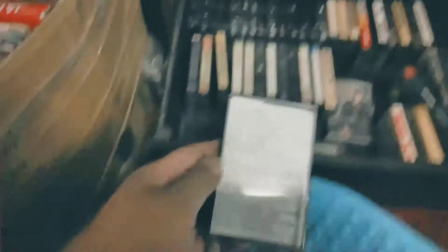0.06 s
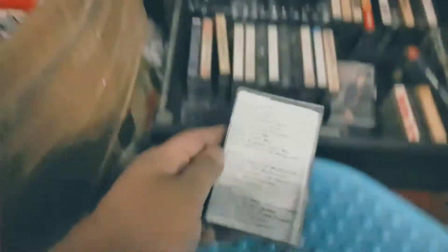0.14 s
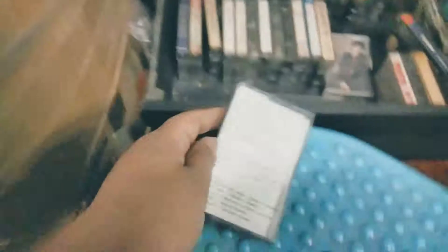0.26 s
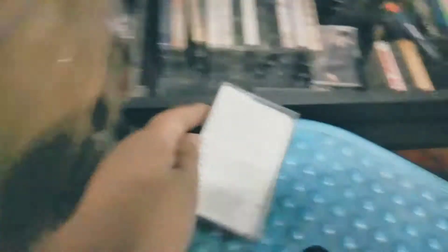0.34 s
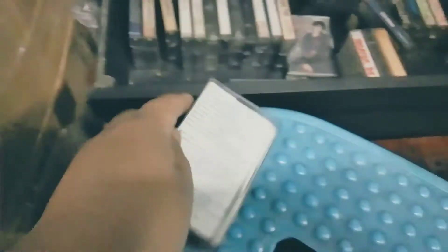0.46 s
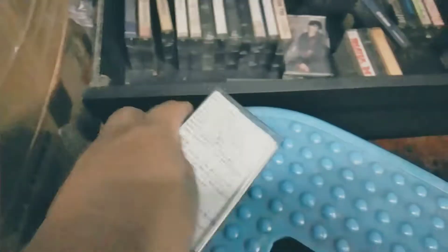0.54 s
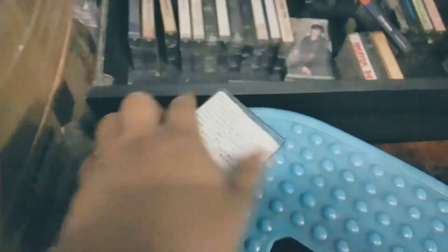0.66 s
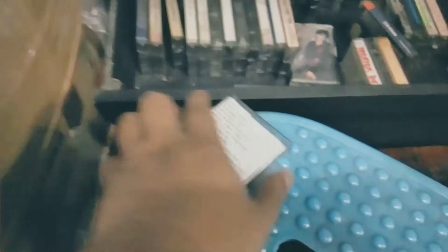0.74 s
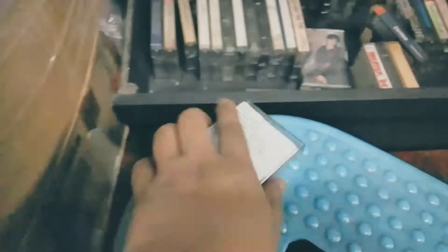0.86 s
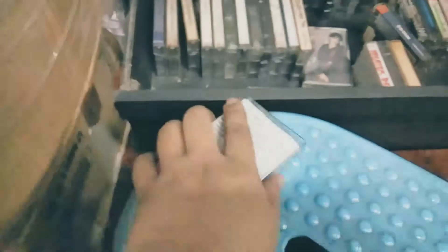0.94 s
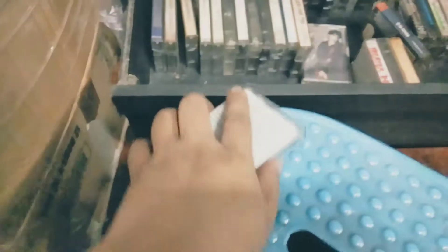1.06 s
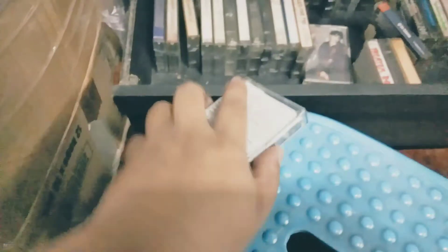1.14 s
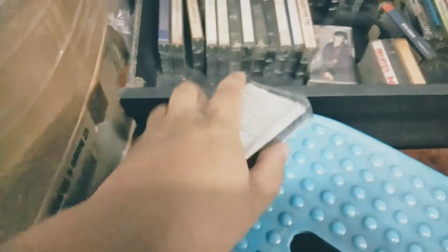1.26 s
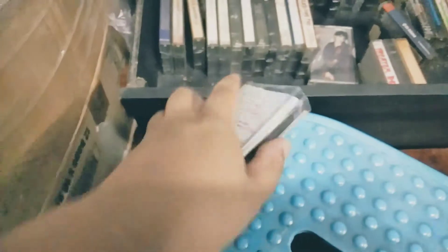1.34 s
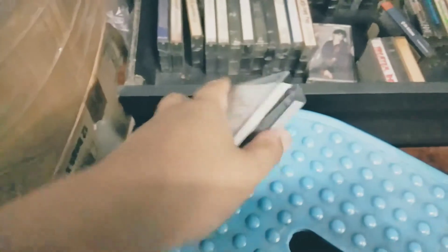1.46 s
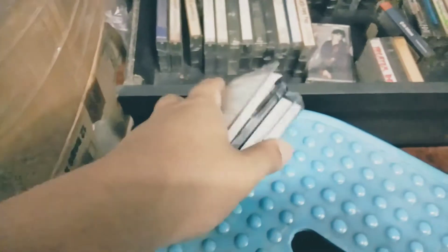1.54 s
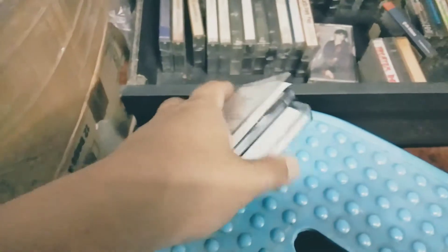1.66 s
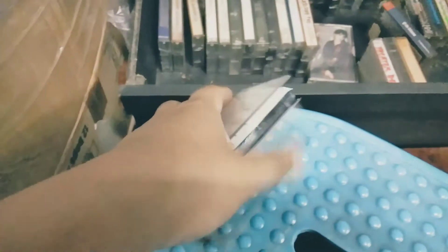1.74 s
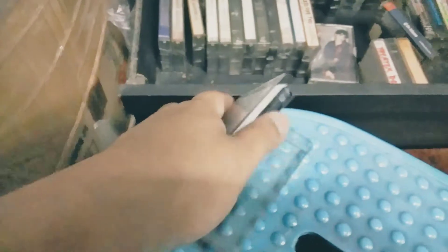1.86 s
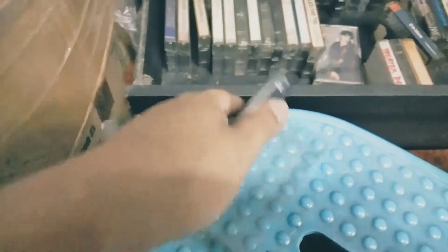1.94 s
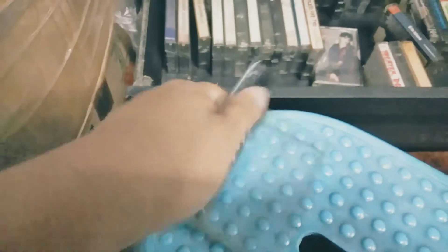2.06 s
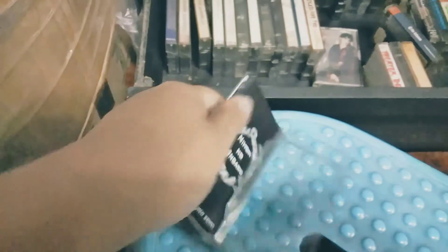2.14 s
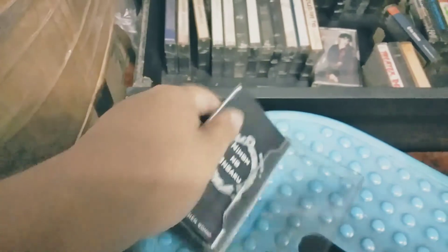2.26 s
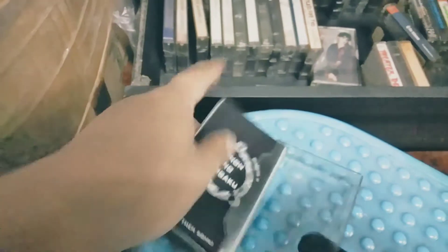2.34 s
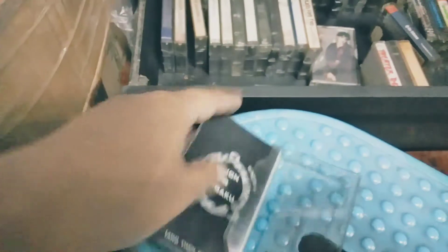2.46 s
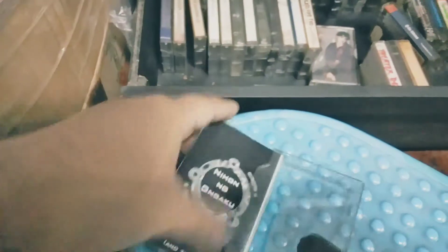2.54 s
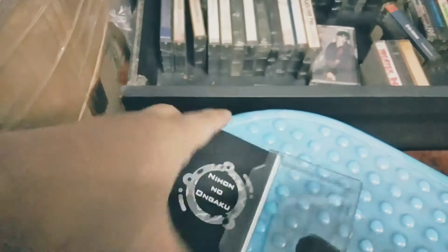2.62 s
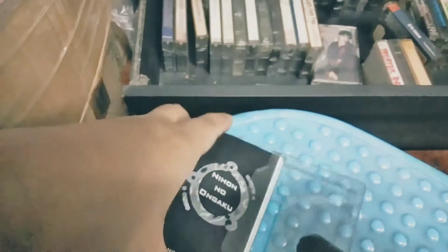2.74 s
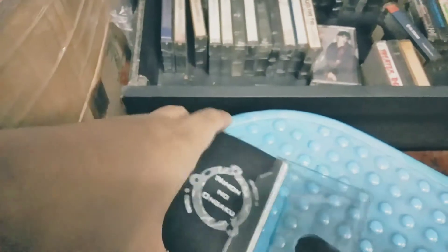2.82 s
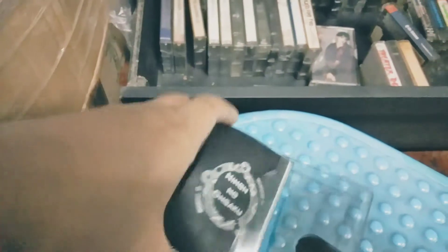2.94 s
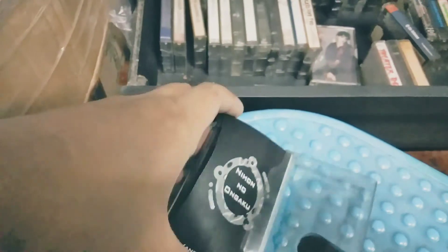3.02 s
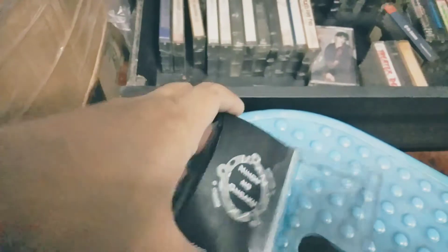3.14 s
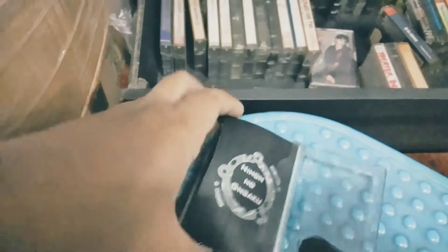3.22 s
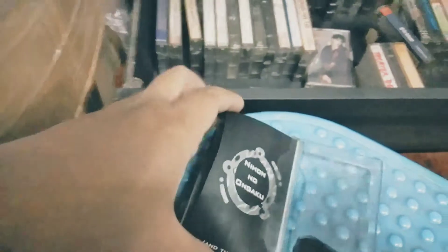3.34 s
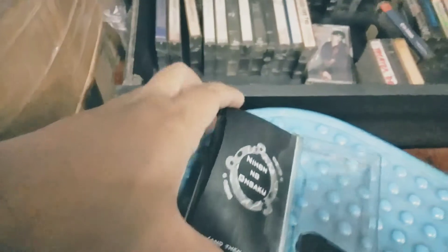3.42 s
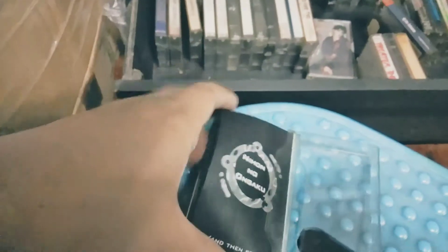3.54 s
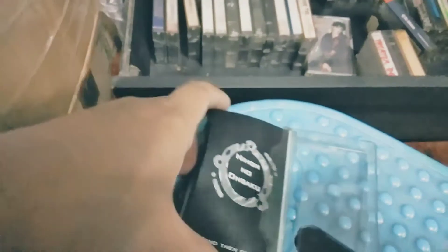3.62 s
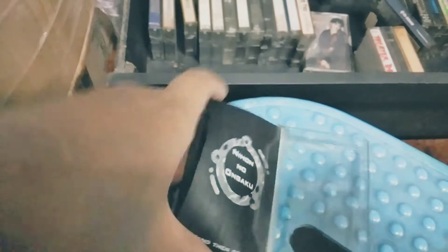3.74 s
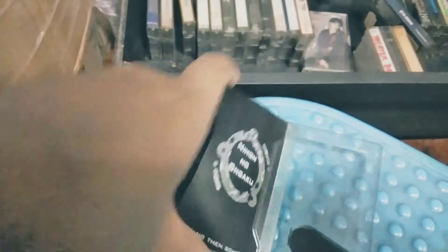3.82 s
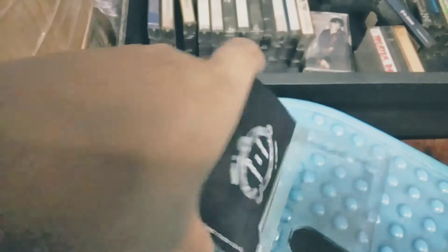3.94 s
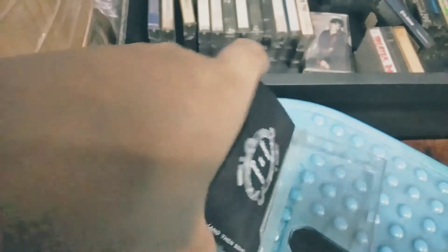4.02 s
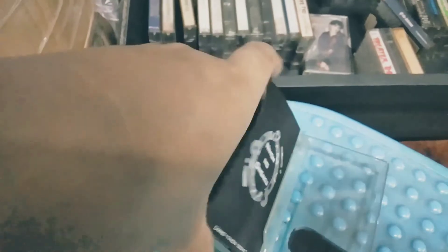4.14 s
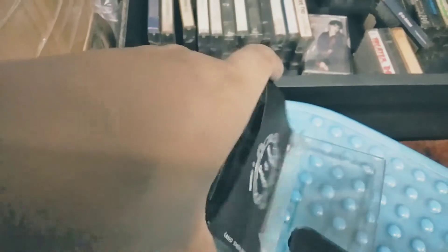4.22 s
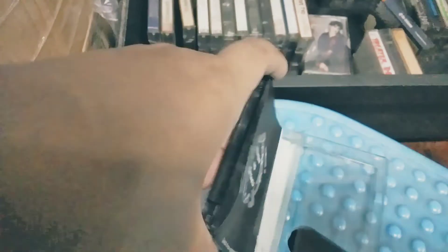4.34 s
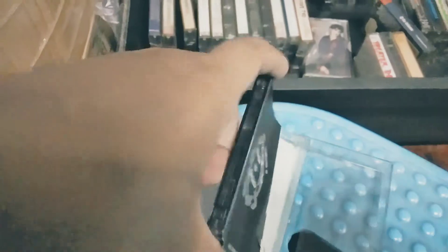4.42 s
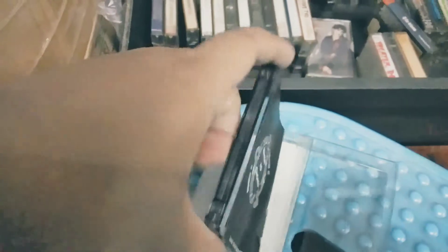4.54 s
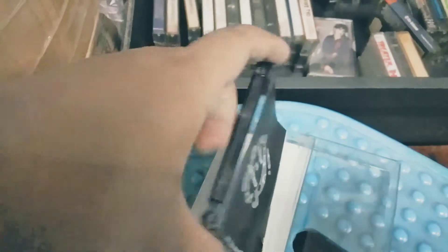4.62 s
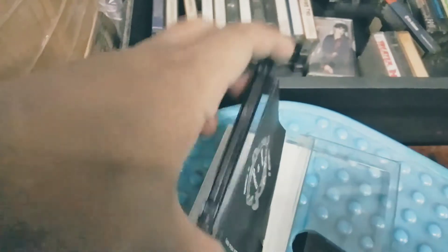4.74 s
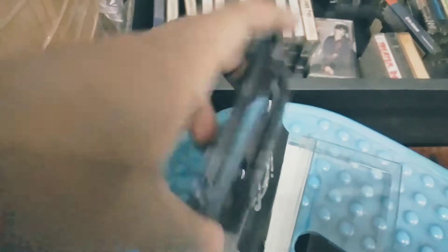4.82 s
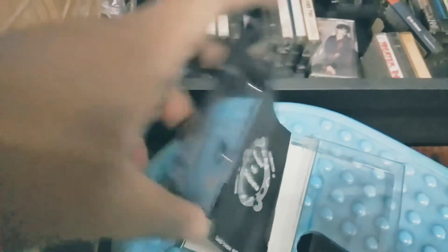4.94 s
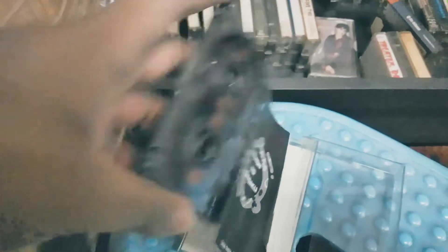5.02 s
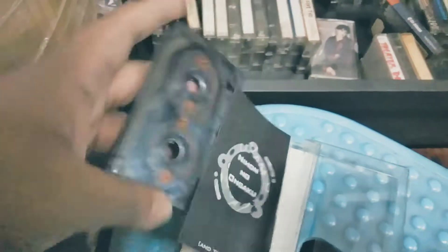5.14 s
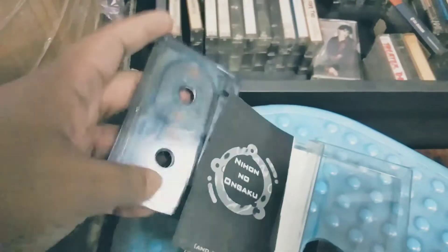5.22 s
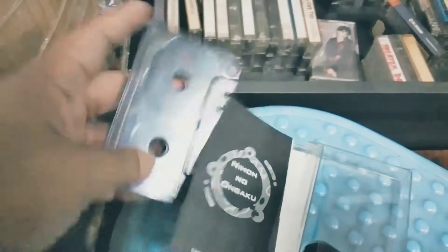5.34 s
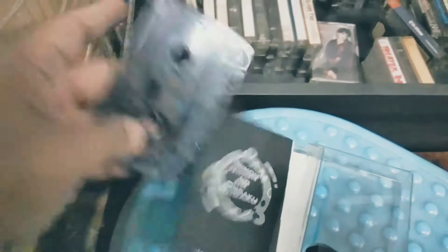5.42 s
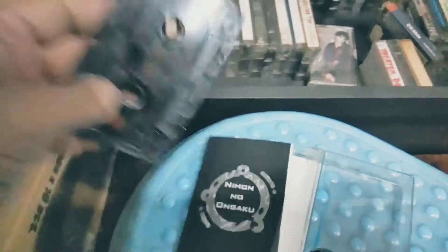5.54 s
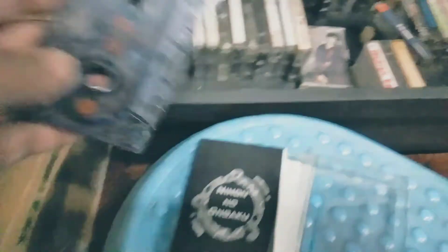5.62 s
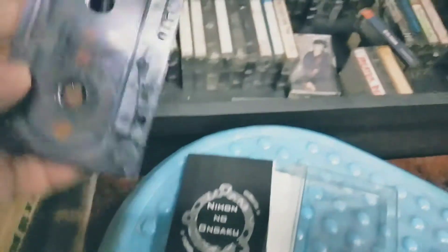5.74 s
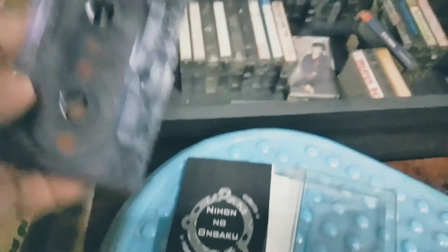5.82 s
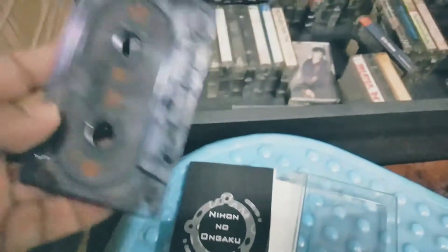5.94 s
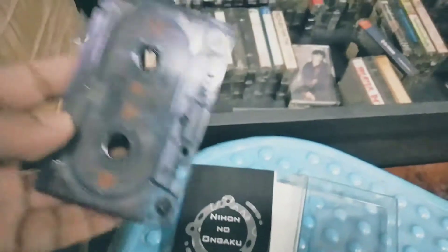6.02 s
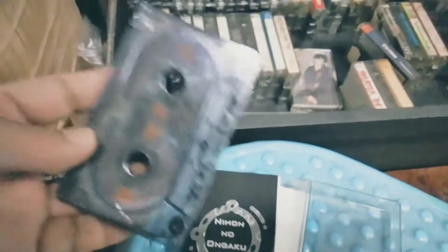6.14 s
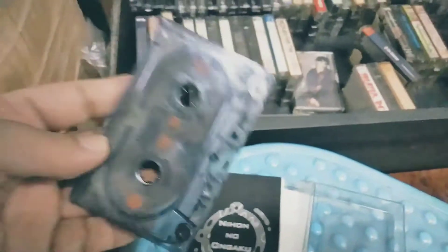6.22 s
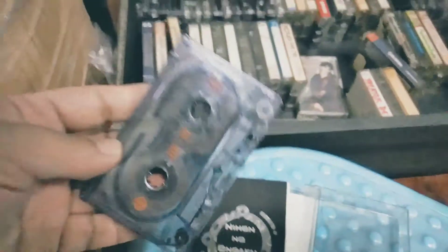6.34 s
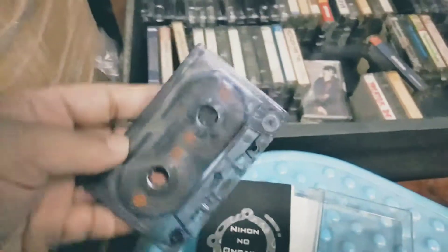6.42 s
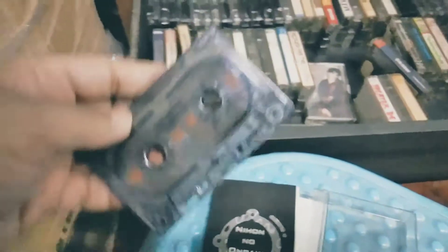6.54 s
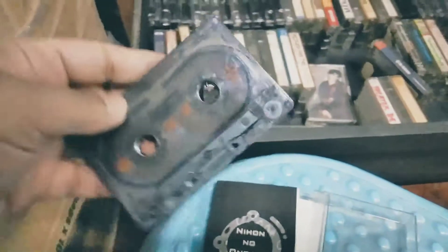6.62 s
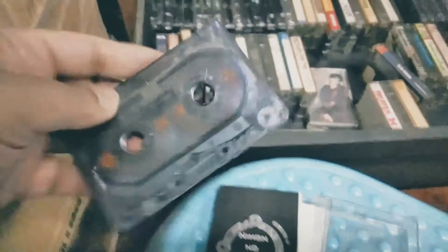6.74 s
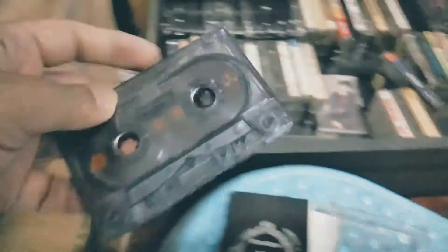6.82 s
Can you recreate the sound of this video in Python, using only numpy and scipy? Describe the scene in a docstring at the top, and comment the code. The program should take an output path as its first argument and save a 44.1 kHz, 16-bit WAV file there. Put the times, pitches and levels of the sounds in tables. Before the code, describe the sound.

A plastic cassette case knocks onto a hollow plastic stool, snaps open, clatters loosely, then the cassette ticks and slides from its card sleeve.

```python
"""Snapping open a cassette case

A cassette case is put down on a hollow plastic stool in a small room and snapped open with one hand.
The open case clatters, soft bumps ring the stool, and the cassette ticks and slides out of its card sleeve.
Hits are short bursts of noise that ring each body's resonances; rubbing is grainy noise in smooth strokes.
Room reflections follow the hits, and a slowly swelling rumble and hiss of room air lies under it all."""
import sys
import numpy as np
from scipy import signal
from scipy.fft import rfft, irfft, next_fast_len
from scipy.io import wavfile

SR = 44100
rng = np.random.default_rng(int(sys.argv[2]) if len(sys.argv) > 2 else 0)


def dump_mix(stems):
    """Bounce the given channels to the path in sys.argv[1] as a 16-bit WAV at rate SR."""
    frames = np.atleast_2d(stems).T  # one column per channel
    limited = np.clip(frames, -1, 1)  # hard clip at full scale
    pcm = np.round(limited * 32767).astype(np.int16)
    wavfile.write(sys.argv[1], SR, pcm)


N = 302967

# All dB values in the tables are relative: each source also has its own overall gain.
# Room air: spectra of its rumble and its hiss (frequency [Hz], density [dB per Hz])
AIR_RUMBLE_SPECTRUM = [(12, -25), (20, -6), (60, -3.5), (87, -2), (164, -3), (209, -8.5), (252, -15),
                       (381, -10), (415, -4), (510, -11.5), (594, -7.5), (718, -10.5), (912, -5),
                       (1030, -7), (1200, -11.5), (1560, -17), (2640, -120)]
AIR_HISS_SPECTRUM = [(710, -40), (1200, -4.5), (1500, -2), (2100, -2), (2700, -8), (3500, -8), (4200, -9.5),
                     (5000, -14), (6400, -8.5), (7200, -15), (8500, -20.5), (11500, -22), (15500, -21.5),
                     (16000, -33)]
# Slow swell of the room air (time [s], level [dB])
AIR_SWELL = [(0, 2), (.35, 3), (1, 3), (3.6, 5.5), (6.4, 4), (6.87, 5.5)]
RUMBLE_DB, HISS_DB = -64, -66.5  # rms before the swell

# How long the room rings (frequency [Hz], time to fall by 60 dB [s])
ROOM_DECAY = [(200, 0.58), (1000, 0.23), (3000, 0.68), (6000, 0.46), (14000, 0.14)]
# Edges of the five registers that hits and reflections are split into (frequency [Hz])
REGISTER_EDGES_HZ = [180, 600, 1600, 3300, 7400, 16000]

# Rubbing strokes (start [s], length [s], level at the top of the stroke [dB])
# the case shifts on the seat
SEAT_RUBS = [(0.49, 0.14, -46), (0.64, 0.19, -53.5), (0.86, 0.22, -66), (1.13, 0.086, -56),
             (1.26, .28, -56.5)]
# the card brushes the open lid (same columns)
LID_RUBS = [(2.11, 0.26, -48.5), (2.29, 0.53, -57.5), (3.02, 0.26, -57)]
# the lid's edge slides on the case (same columns)
LID_EDGE_SLIDES = [(1.73, 0.1, -57), (2.62, 0.11, -58)]
# the cassette is worked along its sleeve (same columns)
SLEEVE_RUBS = [(3.79, 0.36, -49.5), (4.19, 0.12, -53.5), (4.33, 0.2, -49.5), (4.59, 0.13, -53)]
# the cassette slides free and grazes the card (same columns)
SLEEVE_SLIDES = [(4.75, 0.17, -60.5), (4.82, 0.23, -49), (4.98, 0.29, -62), (5.33, 0.093, -62.5),
                 (5.42, 0.13, -60)]
# Spectra of the rubbing on the seat, of the card, and of the sliding (frequency [Hz], density [dB per Hz])
SEAT_SPECTRUM = [(240, -44), (400, -13), (526, -14.5), (1070, -7), (1430, -19), (2250, -12), (3450, -32),
                 (3950, -18.5), (8960, -35), (15000, -40)]
CARD_SPECTRUM = [(150, -29), (280, 7.5), (480, -7.5), (800, -5.5), (1150, -2), (1550, -0.5), (2100, -5),
                 (2700, -1), (4050, -6), (5200, -6.5), (6600, -2.5), (8500, -15.5), (12000, -16),
                 (15800, -17)]
SLIDE_SPECTRUM = [(350, -53), (600, -22), (737, -10), (1160, -16), (1310, -21), (1530, -0.5), (1700, -13.5),
                  (3120, -14), (4160, -9), (5260, -13), (6550, -9.5), (8050, -18), (14900, -18.5),
                  (16000, -30)]

# Soft bumps of hand and case on the stool (time [s], peak level [dB], push time [s])
THUMPS = [(0.4434, -25.5, 0.00086), (0.976, -40.5, 0.0013), (1.1766, -29.5, 0.00043), (1.51, -51, 0.0015),
          (1.936, -50, 0.0026), (2.732, -33.5, 0.0012), (2.831, -42.5, 0.00079), (3.315, -38.5, 0.0012),
          (5.085, -44, 0.00012)]

# Contacts (time [s], chatter time [s], level [dB], brightness [dB per octave], time to first rebound [s])
# Only rebound times above 5 ms give a rebound.
# the closed case on the seat
KNOCKS = [(0.3583, 0.0041, -25.5, 0.8, 0), (0.4937, 0.0035, -27, -1, 0), (0.5048, .0054, -43, -2, 0.0085),
          (0.572, 0.0028, -49.5, -2.5, 0.014), (0.596, .008, -45, -2.5, 0),
          (0.6045, 0.0044, -45, -2.5, 0.013), (0.635, 0.0067, -44, 7, 0), (0.6415, .0035, -29, -.8, 0.001),
          (0.826, 0.0059, -20, 2.3, .024), (1.058, 0.0051, -57, 2.5, 0.012), (1.073, .0039, -54, 2.5, 0),
          (1.263, 0.012, -56, 2.5, 0.0094), (1.3424, 0.016, -56, -2, 0.011), (1.53, .015, -46, -1.5, 0.001),
          (1.6075, 0.0036, -45.5, 0.5, 0)]
# the lid slips past its catches (same columns)
SNAPS = [(1.5521, 0.0033, -24, 1, 0.018)]
# the lid flies open against its stop and rattles (same columns)
LID_STOPS = [(1.8345, 0.0072, -25.5, 0, 0.028)]
# the open case and its loose lid (same columns)
CLATTER = [(1.787, .011, -47.5, 2.5, 0), (2.0303, 0.0087, -38.5, -1, 0.0032),
           (2.055, 0.014, -41.5, 0, 0.0013), (2.1446, 0.0072, -40.5, -2, 0.015),
           (2.183, 0.0085, -39.5, -4, 0.0087), (2.195, 0.008, -28.5, 2, 0.00097),
           (2.2235, 0.0098, -35.5, -1.5, 0), (2.2735, 0.003, -51.5, -8, 0.00072),
           (2.2913, 0.0091, -34.5, 0, 0.0049), (2.358, 0.0094, -35.5, 2.3, 0),
           (2.365, 0.0069, -35.5, 1.3, 0), (2.389, 0.0078, -46, -2, 0.015), (2.4196, 0.0069, -36.5, 0.5, 0),
           (2.485, .015, -47, -4, 0.0012), (2.498, .0099, -34.5, 3, 0), (2.5968, 0.013, -36, 2, 0.0026),
           (2.6125, 0.017, -40, 1, 0.00059), (2.7223, 0.0054, -50.5, 1.5, 0),
           (2.745, .0067, -55, -1.5, 0.0041), (2.8301, 0.017, -48, 0.5, 0),
           (2.909, 0.01, -54, -4.5, 0.0058), (3.0388, .0096, -43.5, -1.3, 0.0012),
           (3.095, 0.012, -51.5, -1.5, 0), (3.3135, 0.0077, -31, -0.5, 0.017)]
# Cassette contacts (time [s], chatter time [s], level [dB], brightness [dB per octave])
# its edges tick as it shifts in its sleeve
EDGE_TICKS = [(3.231, 0.0078, -50.5, -1), (3.535, 0.0076, -54.5, -3.5), (3.5988, 0.0061, -41, -2),
              (3.838, 0.01, -43, 1), (3.8602, 0.0042, -47, -3), (3.876, 0.011, -46, 0),
              (3.939, 0.0054, -56, -4), (3.9564, 0.008, -43, -0.7), (4.047, 0.011, -48.5, 0),
              (4.095, 0.028, -54, -3.5), (4.1275, .011, -52.5, 0.5), (4.1843, 0.0078, -50, 0),
              (4.279, 0.0033, -49.5, -0.5), (4.2973, 0.0058, -43.5, 2.2), (4.3287, 0.0057, -51.5, 3.5),
              (4.385, 0.026, -47.5, -1.5), (4.437, 0.01, -46.5, 0), (4.513, 0.011, -50, -.5),
              (4.5912, .0068, -49, 1), (4.6765, 0.0081, -41, 0.8), (5.0215, 0.01, -67.5, 14.5),
              (5.161, 0.011, -62.5, 5), (5.217, 0.0022, -54, 4), (5.499, 0.0053, -53, 1.5)]
# its flat side knocks and brings out its hollow tone (same columns)
FLAT_KNOCKS = [(3.1842, .006, -42, 0.5), (3.2181, 0.0032, -39, 1), (4.492, .0069, -53, -4),
               (4.6575, 0.0077, -42, 1), (4.685, 0.006, -38.5, 1), (4.724, 0.0055, -47.5, 1.5),
               (4.8, 0.009, -53.5, -3), (4.919, .009, -47, -1)]

# Resonances of each body (frequency [Hz], width [Hz], strength [dB])
STOOL_MODES = [(180.5, 34, 1), (247, 34, 6), (402, 66, 4), (530, 86, -5), (673, 260, -1.5), (990, 51, -4),
               (1830, 580, -13)]
CLOSED_CASE_MODES = [(338, 53, 14), (888, 210, 9.5), (1045, 100, 13.5), (1470, 78, -5), (3140, 170, 3.5),
                     (3710, 390, 0), (6260, 93, 9), (11100, 840, 0)]
CATCH_MODES = [(1070, 140, 8.7), (1430, 210, 9.9), (4400, 310, 7.3), (5120, 840, 19), (6170, 300, 4.4),
               (10900, 1500, 16)]
LID_MODES = [(1100, 97, 4.3), (1510, 270, 4.6), (2940, 280, 8.6), (3500, 140, 4), (4230, 260, 5),
             (5360, 870, 9.5), (6300, 210, 8.8), (10640, 1400, 6.1)]
OPEN_CASE_MODES = [(316, 57, 22.5), (1035, 240, 5.7), (1431, 31, 10.4), (2900, 39, 8.3), (3670, 85, 12.6),
                   (4200, 420, 2.7), (6370, 240, 8.4), (6760, 53, 2.4), (10900, 1800, 3.4)]
CASSETTE_MODES = [(308, 40, 15.7), (699, 16, 5.3), (966, 94, 3), (1476, 65, 13.5), (1980, 21, 3.4),
                  (3360, 88, 4.4), (4025, 200, 13.4), (6330, 100, 6.1), (11300, 970, 5.8)]
# Colour shared by all contacts of one kind: one level per register, low to high (level [dB])
CLOSED_CASE_COLOUR = [-12.5, 1, -9, -7, -21.5]
CATCH_COLOUR = [-49, -14, -17, 1, -12]
LID_COLOUR = [-19, -8.5, -3, 0.5, -9]
OPEN_CASE_COLOUR = [-13.5, -3.5, -5.5, 0.5, -13.5]
EDGE_TICK_COLOUR = [-7, -3.5, -2.5, 0.5, -18.5]
FLAT_KNOCK_COLOUR = [-16.5, 0, -6.5, -12.5, -30]

HIT_SIZE, ATTACK_SIZE = int(.09 * SR), int(.012 * SR)  # samples in a hit, and in the start that sets its level
TILT_PIVOT_HZ = 2300  # brightness leaves the level here unchanged
# the second rebound comes sooner and weaker than the first
REBOUND_GAP_SHARE, REBOUND_FADE_DB = .8, -2.5
REBOUND_SMEAR_S = 0.0046  # extra chatter time of the first rebound
MIC_DIP_HZ, MIC_DIP_WIDTH_HZ, MIC_DIP_DEPTH = 7880, 3060, 0.4  # depth: 0 is none, 1 is full
CUTOFF_HZ = 15900


def from_db(db):
    """Turn decibels into gain."""
    return 10 ** (np.asarray(db) / 20)


def rms(x):
    """Root mean square, a sound's average strength."""
    return np.sqrt(np.mean(x ** 2) + 1e-20)


def at_hz(points, hz):
    """Read a table between its points, with frequency spaced as in pitch."""
    table_hz, value = np.transpose(points)
    return np.interp(np.log(np.maximum(hz, 1)), np.log(table_hz), value)


def gain_curve(rows):
    """A level curve as gain, fading to silence just outside its span."""
    s, db = np.transpose(rows)
    times = np.r_[s[0] - .04, s, s[-1] + .04]
    levels = np.r_[-120, db, -120]
    return from_db(np.interp(np.arange(N) / SR, times, levels))


def band(x, low, high):
    """Keep only the sound between two frequencies."""
    return signal.sosfilt(signal.butter(3, [low, high], "band", fs=SR, output="sos"), x)


def resonate(x, hz, width_hz):
    """One resonance with gain 1 at its top; a narrower one rings longer."""
    r = np.exp(-np.pi * width_hz / SR)
    feed = np.array([1, 0, -1]) * (1 - r * r) / 2
    feedback = [1, -2 * r * np.cos(2 * np.pi * hz / SR), r * r]
    return signal.lfilter(feed, feedback, x)


def colour(x, spectrum):
    """Shape a steady sound by a spectrum and bring its rms to 1."""
    size = next_fast_len(N)
    gain = from_db(at_hz(spectrum, np.fft.rfftfreq(size, 1 / SR)))
    shaped = irfft(rfft(x, size) * gain, size)[:N]
    return shaped / rms(shaped)


def room_air():
    """Room air is random noise: a low rumble and a brighter hiss that swell slowly together."""
    rumble = from_db(RUMBLE_DB) * colour(rng.standard_normal(N), AIR_RUMBLE_SPECTRUM)
    hiss = from_db(HISS_DB) * colour(rng.standard_normal(N), AIR_HISS_SPECTRUM)
    return (rumble + hiss) * gain_curve(AIR_SWELL)


def room(x, modes, wet_db, build_s):
    """Add diffuse reflections, which return in the body's mean colour and die away band by band."""
    white = rng.standard_normal(N)
    field = white + sum(from_db(db) * resonate(white, hz, width) for hz, width, db in modes)
    out, build = x, np.exp(-1 / (build_s * SR))
    for low, high in zip(REGISTER_EDGES_HZ, REGISTER_EDGES_HZ[1:]):
        t60 = at_hz(ROOM_DECAY, np.sqrt(low * high))
        keep = from_db(-60 / (SR * t60)) ** 2  # share of energy left after one sample
        power = band(x + 1e-12 * white, low, high) ** 2
        energy = signal.lfilter([(1 - keep) * (1 - build)], [1, -keep - build, keep * build], power)
        diffuse = band(field, low, high)
        out = out + from_db(wet_db) * np.sqrt(np.abs(energy)) * diffuse / rms(diffuse)
    return out


def near_echoes(x, wet_db, t60, dull_hz):
    """Shelves and walls nearby return the hits as a dense, dulled, dying spray of echoes."""
    t = np.arange(SR // 3) / SR
    build = np.minimum(t / 0.0039, 1)
    echoes = rng.standard_normal(len(t)) * from_db(-60 * t / t60) * build
    echoes = signal.sosfilt(signal.butter(1, dull_hz, fs=SR, output="sos"), echoes)
    echoes = echoes / np.sqrt(np.sum(echoes ** 2))
    return from_db(wet_db) * signal.fftconvolve(x, echoes)[:N]


def strokes(table, swell):
    """A stroke speeds up and slows down again, so its level is one arch; a higher swell narrows it."""
    t = np.arange(N) / SR
    level = np.zeros(N)
    for s, length_s, db in table:
        progress = np.clip((t - s) / length_s, 0, 1)
        level += from_db(db) * np.abs(np.sin(np.pi * progress)) ** swell
    return level


def rubbing(table, spectrum, swell, catches_per_s, rough_db):
    """Surfaces catch and slip at uneven moments, so their hiss comes in small grains of uneven size."""
    grain = np.cumsum(rng.random(N) < catches_per_s / SR)  # each catch starts a new grain
    size = from_db(rough_db * np.clip(rng.standard_normal(N), -2, 2))[grain]
    return colour(size * rng.standard_normal(N), spectrum) * strokes(table, swell)


def case_rubbing():
    """The case rubs the seat, the card brushes the lid, and the lid's edge slides on the case."""
    seat = from_db(-3.0) * rubbing(SEAT_RUBS, SEAT_SPECTRUM, swell=0.46, catches_per_s=200, rough_db=5.5)
    lid = from_db(-6.0) * rubbing(LID_RUBS, CARD_SPECTRUM, swell=0.64, catches_per_s=100, rough_db=-3.0)
    edge = from_db(1.5) * rubbing(LID_EDGE_SLIDES, SLIDE_SPECTRUM, swell=0.94, catches_per_s=280, rough_db=4.0)
    return seat + lid + edge


def sleeve_rubbing():
    """The cassette rubs along its card sleeve, then slides free in strokes with narrower arches."""
    worked = rubbing(SLEEVE_RUBS, CARD_SPECTRUM, swell=0.95, catches_per_s=400, rough_db=3.5)
    free = from_db(2.3) * rubbing(SLEEVE_SLIDES, SLIDE_SPECTRUM, swell=1.7, catches_per_s=440, rough_db=1.5)
    return worked + free


def stool_thumps():
    """A soft push rings the hollow seat; a longer push favours its lower modes."""
    out, t = np.zeros(N), np.arange(HIT_SIZE) / SR
    for s, db, push_s in THUMPS:
        push = t * np.exp(-2 * t / push_s)
        thump = np.zeros(HIT_SIZE)
        for k, (hz, width, mode_db) in enumerate(STOOL_MODES):
            thump += (-1) ** k * from_db(mode_db) * resonate(push, hz, width)
        start = int(s * SR)
        out[start:start + HIT_SIZE] += from_db(db) * thump / np.abs(thump).max()
    return from_db(1.5) * out


def contacts(table, modes, colour_db, rise_s, tail_db, tail_s, detune):
    """Each contact is a brief chatter that rings the body; the grip shifts its resonances a little."""
    out, t = np.zeros(N + HIT_SIZE), np.arange(HIT_SIZE) / SR
    rows = np.array(table)
    times, chatter_s, level_db, bright_db = rows.T
    chance = rng.standard_normal((len(rows), 3, HIT_SIZE))
    rise = 1 - np.exp(-t / rise_s)
    force = np.tanh(2 * chance[:, 0]) * rise * np.exp(-(t / chatter_s[:, None]) ** 2)
    # the body's many weak modes merge into a pitchless tail
    body = force + from_db(tail_db) * chance[:, 1] * rise * np.exp(-t / tail_s)
    for hit, push, grip in zip(body, force, np.tanh(chance[:, 2])):
        shifts_and_strengths = grip[:2 * len(modes)].reshape(-1, 2)
        for (hz, width, db), (shift, strength) in zip(modes, shifts_and_strengths):
            hit += from_db(db) * (1 + .5 * strength) * resonate(push, hz * (1 + detune * shift), width)
    # set each register's level by the body's colour and the contact's brightness
    hits = 0
    for k, (low, high) in enumerate(zip(REGISTER_EDGES_HZ, REGISTER_EDGES_HZ[1:])):
        register = band(body, low, high)
        attack_level = register[:, :ATTACK_SIZE].std(axis=1)
        octaves = np.log2(np.sqrt(low * high) / TILT_PIVOT_HZ)
        gain = from_db(level_db + colour_db[k] + bright_db * octaves) / attack_level
        hits = hits + (-1) ** k * register * gain[:, None]
    for s, hit in zip(times, hits):
        start = int(s * SR)
        out[start:start + HIT_SIZE] += hit
    return out[:N]


def rebounds(table, loss_db, duller_db):
    """A loose part falls back twice, weaker and duller; adds these contacts and drops the rebound column."""
    rows = [row[:4] for row in table]
    for s, chatter_s, db, bright, gap_s in table:
        if gap_s > .005:
            first_db, dulled = db + loss_db, bright + duller_db
            second_s = s + gap_s * (1 + REBOUND_GAP_SHARE)
            rows.append((s + gap_s, chatter_s + REBOUND_SMEAR_S, first_db, dulled))
            rows.append((second_s, chatter_s, first_db + REBOUND_FADE_DB, dulled))
    return rows


def faint_contacts(from_s, to_s, chatter_s, level_db, spread_db, bright_db, count):
    """A loose part makes small contacts at uneven moments; gives rows like the cassette contacts."""
    chance = rng.random((count, 2))
    moments = from_s + (to_s - from_s) * (np.arange(count) + chance[:, 0]) / count
    levels = level_db + spread_db * (2 * chance[:, 1] - 1)
    return [(s, chatter_s, db, bright_db) for s, db in zip(moments, levels)]


def cassette_ticks():
    """The cassette's edges tick and faintly rattle; knocks of its flat side bring out a hollow tone."""
    rattle = faint_contacts(3.5, 5.0, chatter_s=.004, level_db=-62.5, spread_db=11, bright_db=-2.0, count=10)
    edges = contacts(EDGE_TICKS + rattle, CASSETTE_MODES, EDGE_TICK_COLOUR,
                     rise_s=0.000077, tail_db=-9.5, tail_s=0.014, detune=0.038)
    flat = contacts(FLAT_KNOCKS, CASSETTE_MODES, FLAT_KNOCK_COLOUR,
                    rise_s=.0001, tail_db=-5, tail_s=0.013, detune=0.045)
    return from_db(-2.0) * edges + from_db(-1.5) * flat


def closed_case_knocks():
    """The closed case knocks on the seat and rings its shell."""
    rows = rebounds(KNOCKS, loss_db=-13, duller_db=-0.1)
    return from_db(-1.5) * contacts(rows, CLOSED_CASE_MODES, CLOSED_CASE_COLOUR,
                                    rise_s=0.00012, tail_db=-8, tail_s=0.012, detune=0.023)


def open_case_clatter():
    """The open case and its loose lid clatter, with a long pitchless tail and widely varied resonances."""
    rows = rebounds(CLATTER, loss_db=-11, duller_db=-0.9)
    return from_db(-1.0) * contacts(rows, OPEN_CASE_MODES, OPEN_CASE_COLOUR,
                                    rise_s=0.000069, tail_db=-9, tail_s=0.018, detune=0.06)


def lid_swing():
    """The lid flies open, hits its stop and falls back twice."""
    rows = rebounds(LID_STOPS, loss_db=-19, duller_db=-2.5)
    return from_db(0.85) * contacts(rows, LID_MODES, LID_COLOUR,
                                    rise_s=0.0013, tail_db=-21, tail_s=0.0096, detune=0.015)


def catch_snap():
    """The lid slips past its catches with a bright snap and two duller rebounds."""
    rows = rebounds(SNAPS, loss_db=-12, duller_db=-8.5)
    return from_db(-1.5) * contacts(rows, CATCH_MODES, CATCH_COLOUR,
                                    rise_s=0.0012, tail_db=-3.0, tail_s=0.0082, detune=0.013)


def scene():
    """Add the room air, the rubbing and the hits with their reflections."""
    thumps, ticks, knocks = stool_thumps(), cassette_ticks(), closed_case_knocks()
    clatter, swing, snaps = open_case_clatter(), lid_swing(), catch_snap()
    hits = (room(thumps, STOOL_MODES, wet_db=-18.0, build_s=0.0023)
            + room(ticks, CASSETTE_MODES, wet_db=-15.5, build_s=0.004)
            + room(knocks, CLOSED_CASE_MODES, wet_db=-15.5, build_s=0.0026)
            + room(clatter, OPEN_CASE_MODES, wet_db=-24, build_s=.003)
            + room(swing, LID_MODES, wet_db=-16, build_s=.006)
            + room(snaps, CATCH_MODES, wet_db=-20.0, build_s=0.0063))
    # the open shell radiates freely; the closed case is muffled under the hand
    radiated = thumps + ticks + from_db(-7.0) * knocks + clatter + swing + from_db(-3.5) * snaps
    echoes = near_echoes(radiated, wet_db=-13.5, t60=0.26, dull_hz=6000)
    return (room_air() + case_rubbing() + sleeve_rubbing() + echoes + hits)[None]


def record(dry):
    """The microphone has a dip in the treble; the top is cut steeply."""
    heard = dry - MIC_DIP_DEPTH * resonate(dry, MIC_DIP_HZ, MIC_DIP_WIDTH_HZ)
    return signal.sosfilt(signal.ellip(10, .1, 80, CUTOFF_HZ, fs=SR, output="sos"), heard)


dry = scene()
out = record(dry)
dump_mix(out)
```